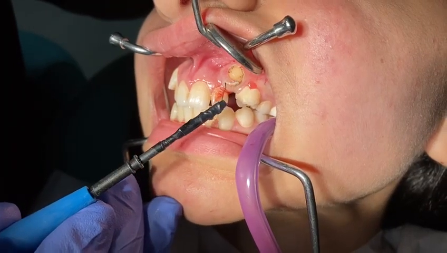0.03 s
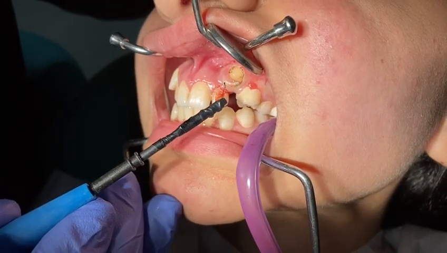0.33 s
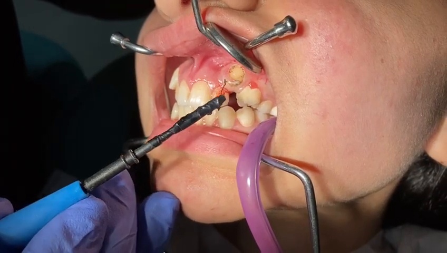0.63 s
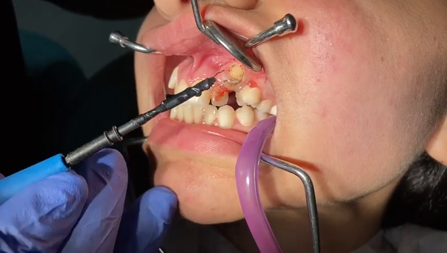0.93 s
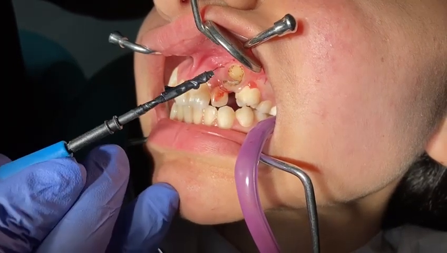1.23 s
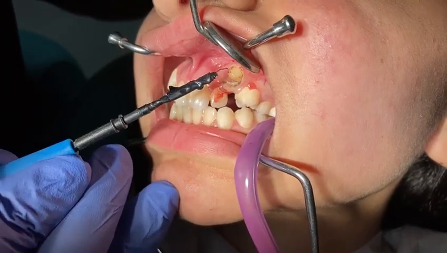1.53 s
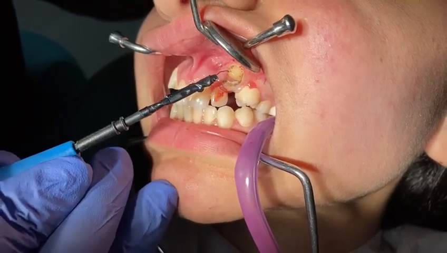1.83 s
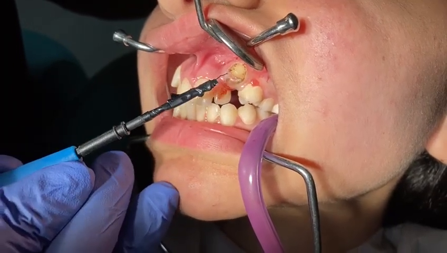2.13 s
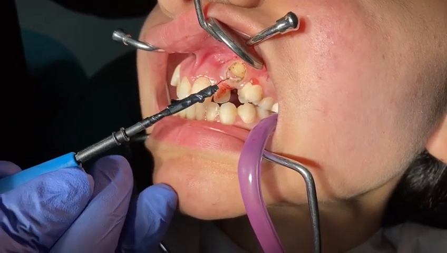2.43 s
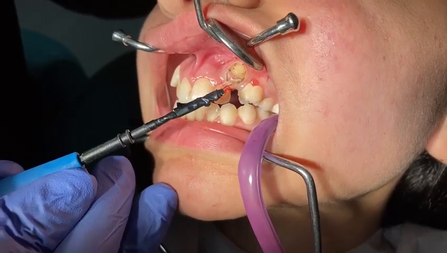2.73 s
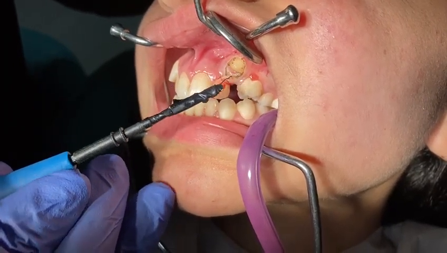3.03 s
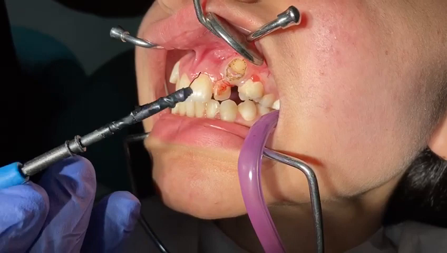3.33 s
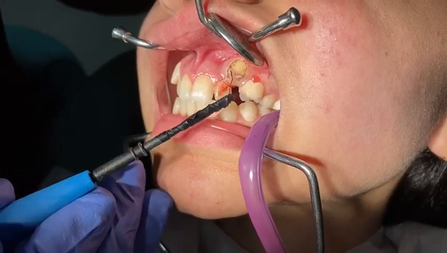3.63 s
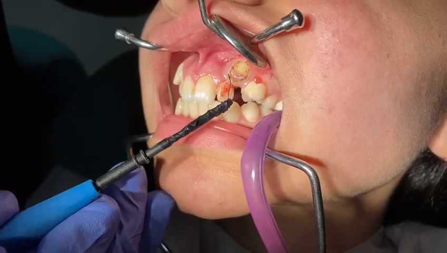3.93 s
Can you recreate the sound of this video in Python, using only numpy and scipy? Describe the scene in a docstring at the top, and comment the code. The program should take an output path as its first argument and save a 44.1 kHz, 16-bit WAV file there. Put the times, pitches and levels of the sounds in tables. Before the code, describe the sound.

A dental suction tube hisses steadily in a mouth, with a faint wet sizzle.

```python
"""A dental suction tube draws air steadily in a patient's open mouth, close to a stereo microphone.
The rushing air rings in the hollows of tube and mouth, and the narrow tip adds a bright hiss.
Saliva makes a fine sizzle and brief wet whistles. Near the end the tool moves and new pitches ring out.
Underneath lie the low air noise of the clinic room, one soft bump on the camera and three faint hums."""
import sys
import numpy as np
from scipy import signal
from scipy.fft import rfft, irfft, next_fast_len
from scipy.io import wavfile
from scipy.ndimage import uniform_filter1d, map_coordinates

SR = 44100
rng = np.random.default_rng(int(sys.argv[2]) if len(sys.argv) > 2 else 0)


def wav_record(signal):
    """Record a signal, one row per channel, as 16-bit PCM in the file named by sys.argv[1]."""
    frames = np.transpose(np.atleast_2d(signal))
    bounded = np.clip(frames, -1, 1)
    # unit amplitude maps onto the largest positive 16-bit level
    quanta = np.round(bounded * 32767).astype(np.int16)
    wavfile.write(sys.argv[1], SR, quanta)


N = 176400

# How strongly each pitch rings in the hollows of tube and mouth: pitch_hz, relative_db
RUSH_COLOUR = [(500, -59), (900, -25), (1130, -10.5), (1340, -4.5), (1550, -28.5), (1870, -12), (2000, -20),
               (2230, -8), (2480, -4), (2660, -10), (3120, -0.5), (3780, 1), (3950, -7), (4180, -10.5),
               (4320, -7.5), (4800, -9), (5150, -14.5), (5470, -2.5), (5850, -9), (6100, -21.5),
               (6350, -37), (7000, -66)]
# Narrow peaks and one dip that the tube adds: pitch_hz, width_hz, change_db
TUBE_RINGS = [(3181, 70, 2), (3300, 50, -2), (3700, 60, 2), (4820, 90, 4)]
# Slow drift of the rush's loudness: time_s, relative_db
RUSH_LEVEL = [(0.0, -36), (0.4, -36), (0.8, -35.5), (1.2, -35.5), (1.6, -35.5), (2.0, -36), (2.4, -36.5),
              (2.8, -36), (3.2, -35.5), (3.6, -35.5), (4.0, -34.5)]
# Brief surges and a dip of the rush: middle_s, change_db, half_length_s
RUSH_SURGES = [(.428, .8, .015), (.612, -2, .02), (1.06, 1, .04), (2.669, 2, .016), (3.347, 1.5, .006)]
# Drift of the rush below RUSH_LOW_HZ: time_s, change_db
RUSH_LOW_DRIFT = [(0, 0.5), (2, -0.5), (2.4, -2), (2.7, 0.5), (3.3, -1.5), (4, -2)]
# Drift of the rush above RUSH_HIGH_HZ: time_s, change_db
RUSH_HIGH_DRIFT = [(0, 1), (1.2, -2.6), (2.6, -0.5), (3.3, -1.5), (4, -1)]
RUSH_LOW_HZ, RUSH_HIGH_HZ, RUSH_GAIN_DB = 1720, 4450, 1.77

# How strong each pitch is in the hiss at the tip: pitch_hz, relative_db
HISS_COLOUR = [(5500, -54), (6250, -16.5), (6500, -8.5), (7450, -3), (8500, -0.5), (8950, -9), (9700, 2),
               (10380, -1), (10670, -19.5), (10850, -3.5), (11650, -2.5), (11900, -29)]
# Slow drift of the hiss's loudness: time_s, relative_db
HISS_LEVEL = [(0.0, -31), (0.4, -31.5), (0.8, -31.5), (1.2, -31), (1.6, -30.5), (2.0, -31), (2.4, -30.5),
              (2.8, -31), (3.2, -31.5), (3.6, -31), (4.0, -29.5)]
# Drift of the hiss below HISS_LOW_HZ: time_s, change_db
HISS_LOW_DRIFT = [(0, 0.9), (.8, 1.5), (2.2, 0), (3.2, 1.4), (3.6, -0.5), (4, -2)]
HISS_LOW_HZ, HISS_GAIN_DB = 8340, 0.33

# How alike left and right are for rush and hiss: pitch_hz, likeness_0_to_1
SUCTION_LIKENESS = [(850, .9), (1350, .75), (1650, .92), (2350, .62), (2600, .93), (2660, .995),
                    (2730, .99), (2850, .85), (3300, .66), (3650, .98), (4200, .48), (5000, .35),
                    (5400, .8), (5950, .8), (6450, 1), (7250, 1), (7900, .66), (8600, 1), (9500, 1),
                    (10500, .62), (11050, 1)]
# How far the suction's wave on the left runs ahead of the right: pitch_hz, lead_radians
LEFT_LEAD = [(900, 0), (1550, 2.95), (1950, 3.2), (2250, 4.05), (2600, 3), (2690, 3.14), (2770, 3.3),
             (3050, 4.75), (3850, 6.7), (4700, 5.7), (5000, 6.55), (5200, 9.2), (6000, 9.2), (6250, 6.25),
             (7450, 6.2), (8500, 3.15), (9550, 3.15), (10200, 1.8), (10750, 0)]
# How much louder the suction is on the left: pitch_hz, left_over_right_db
LEFT_LOUDER = [(800, .5), (1250, 2.8), (1600, .8), (2000, 1.6), (2350, 10), (2620, 0), (2780, 0),
               (3150, 4.5), (3330, 3.5), (3430, 0), (3800, .3), (4400, 8.7), (4950, 9), (5200, 1.8),
               (5800, 1.2), (6020, 3.5), (6300, 0)]

# How strong each pitch is in the room's air noise: pitch_hz, relative_db
ROOM_COLOUR = [(15, -46), (25, -18.5), (75, -6.5), (220, -2.5), (340, 2.5), (383, -3.5), (472, 1),
               (533, -4), (583, -0.5), (900, -7), (1170, -10.5), (1980, -120)]
# A further cut of the room noise, mildest at 1600 Hz: pitch_hz, change_db
ROOM_CUT = [(900, -18), (1600, -1), (4000, -60)]
# Low pitches that ring in the room noise: pitch_hz, width_hz, change_db
ROOM_RINGS = [(161.6, 16, 6), (208, 40, 3.5)]
# How alike left and right are for the room noise: pitch_hz, likeness_0_to_1
ROOM_LIKENESS = [(30, .88), (120, 1), (230, 1), (340, .92), (650, .65), (850, .9)]
# Drift of the room's rumble below RUMBLE_HZ: time_s, change_db
RUMBLE_DRIFT = [(0, 5), (.8, 4), (1.2, 1), (3, 0), (4, 2.5)]
RUMBLE_HZ, ROOM_DB = 127, -54.5

# Wet whistles of saliva: middle_s, pitch_hz, level_db, half_length_s
WHISTLES = [(.425, 3450, -35.5, .012), (1.055, 3620, -34, .011), (1.354, 3720, -33, .008),
            (1.624, 3170, -34, .014), (2.665, 3250, -32, .012), (2.935, 3650, -35, .008),
            (3.344, 3500, -29, .004), (3.984, 3770, -33, .01)]
# Faint hums in the room: middle_s, pitch_hz, level_db, half_length_s
HUMS = [(1.77, 621, -58.5, .09), (1.91, 469, -60.5, .09), (2.03, 624, -65.5, .07)]
# Pitches that ring out as the tool moves: middle_s, pitch_hz, change_db, half_length_s
TOOL_MOVES = [(3.35, 4520, 2.5, .13), (3.74, 5020, 4.5, .2), (3.85, 4230, 2.5, .13), (3.78, 6100, 5.5, .22)]


def amp(db):
    """Turn decibels into a number to multiply by."""
    return 10 ** (np.asarray(db) / 20)


def unit(x):
    """Scale a sound to an average strength (rms) of 1."""
    return x / np.sqrt(np.mean(x ** 2) + 1e-20)


def at_pitch(table, hz):
    """Read between the rows of a pitch table, with octaves about evenly spaced."""
    pitches, values = np.transpose(table)
    return np.interp(np.log(hz + 1), np.log(pitches + 1), values)


def over_time(table):
    """Join the rows of a time table with straight lines, one value per sample."""
    return np.interp(np.arange(N) / SR, *np.transpose(table))


def hill(middle_s, half_s):
    """A smooth rise to 1 and back, about a third as high half_s from its middle."""
    return np.exp(-((np.arange(N) / SR - middle_s) / half_s) ** 2)


def wobble(per_s):
    """A smooth curve through per_s random values a second."""
    return map_coordinates(rng.standard_normal(4000), [np.arange(N) * per_s / SR], mode="wrap")


def filtered(x, response):
    """Multiply each pitch in x by response(hz)."""
    size = next_fast_len(N + SR // 2)
    hz = np.fft.rfftfreq(size, 1 / SR)
    return irfft(rfft(x, size) * response(hz), size)[..., :N]


def ring_db(rings, hz):
    """Decibels that narrow peaks or dips add at each pitch."""
    return sum(db / (1 + (2 * (hz - pitch) / width) ** 2) for pitch, width, db in rings)


def drift_band(x, edge_hz, drift, above=False):
    """Turn the part below (or above) edge_hz up and down over time."""
    low = filtered(x, lambda hz: 1 / (1 + (hz / edge_hz) ** 20))
    return x + (amp(over_time(drift)) - 1) * (x - low if above else low)


def swirling_air(colour, likeness, patchy_db):
    """Uneven stereo noise, like swirling air; colour(hz) gives each pitch's relative decibels."""
    grid = signal.stft(rng.standard_normal((2, N)), nperseg=512)[2]  # side, pitch, time
    patches = uniform_filter1d(rng.standard_normal(grid.shape[1:]), size=4, axis=0)
    patches = unit(uniform_filter1d(patches, size=7, axis=1))
    noise = signal.istft(grid * amp(patchy_db * patches), nperseg=512)[1][:, :N]

    def response(hz):
        spread = np.arccos(np.clip(at_pitch(likeness, hz), 0, 1)) / 2  # 0 makes both sides the same
        return amp(colour(hz)) * [np.cos(spread), np.sin(spread)]
    shared, opposite = filtered(noise, response)
    return unit(np.array([shared + opposite, shared - opposite]))


def rush(flow_db, flutter_db):
    """Rushing air rings in the hollows of tube and mouth, with brief surges."""
    surge_db = sum(db * hill(middle_s, half_s) for middle_s, db, half_s in RUSH_SURGES)
    level_db = over_time(RUSH_LEVEL) + RUSH_GAIN_DB + surge_db + flow_db + flutter_db * wobble(per_s=65)
    colour = lambda hz: at_pitch(RUSH_COLOUR, hz) + ring_db(TUBE_RINGS, hz)
    air = amp(level_db) * swirling_air(colour, SUCTION_LIKENESS, patchy_db=0.6)
    air = drift_band(air, RUSH_LOW_HZ, RUSH_LOW_DRIFT)
    return drift_band(air, RUSH_HIGH_HZ, RUSH_HIGH_DRIFT, above=True)


def tip_hiss(flow_db, flutter_db):
    """A jet of air through the narrow tip makes a bright, quickly fluttering hiss."""
    level_db = over_time(HISS_LEVEL) + HISS_GAIN_DB + flow_db + flutter_db * wobble(per_s=94)
    jet = swirling_air(lambda hz: at_pitch(HISS_COLOUR, hz), SUCTION_LIKENESS, patchy_db=1.1)
    return drift_band(amp(level_db) * jet, HISS_LOW_HZ, HISS_LOW_DRIFT)


def saliva_sizzle(drops_per_s=220, low_hz=3700, high_hz=6200, ring_s=0.055, level_db=-49):
    """Tiny drops are drawn into the tube, each ringing briefly at its own pitch."""
    when, pitch, size = rng.random((int(drops_per_s * N / SR), 3)).T[:, :, None]
    t = np.arange(int(ring_s * SR)) / SR
    hz = low_hz * (high_hz / low_hz) ** pitch
    rise_and_fade = np.sqrt(t) * 1000 ** (-t / ring_s)
    drops = size * rise_and_fade * np.sin(2 * np.pi * hz * t) / hz  # higher drops are quieter
    positions = (when * N).astype(int) + np.arange(len(t))
    sizzle = np.bincount(positions.ravel(), drops.ravel(), N)[:N]  # add each drop at its own time
    return amp(level_db) * unit(sizzle)


def left_and_right(x):
    """Each pitch reaches the microphone's two openings with its own timing and loudness."""
    def response(hz):
        sides = np.array([[.5], [-.5]])
        gain = amp(sides * at_pitch(LEFT_LOUDER, hz))
        gain /= np.sqrt(np.mean(gain ** 2, axis=0))  # keep the total power
        return gain * np.exp(1j * sides * at_pitch(LEFT_LEAD, hz))
    return filtered(x, response)


def suction(unsteady_db):
    """One slightly unsteady flow of air drives rush and hiss; saliva adds sizzle and whistles."""
    flow_db = unsteady_db * wobble(per_s=48)
    air = rush(flow_db, flutter_db=0.21) + tip_hiss(flow_db, flutter_db=0.15)
    wet_air = moving_tool(air + saliva_sizzle())
    return left_and_right(wet_air + saliva_whistles())


def room_air():
    """The clinic's air makes a low, even noise over a slowly changing rumble."""
    colour = lambda hz: at_pitch(ROOM_COLOUR, hz) + at_pitch(ROOM_CUT, hz) + ring_db(ROOM_RINGS, hz)
    air = swirling_air(colour, ROOM_LIKENESS, patchy_db=1.3)
    return amp(ROOM_DB) * drift_band(air, RUMBLE_HZ, RUMBLE_DRIFT)


def soft_tone(middle_s, pitch_hz, level_db, half_s, fall_hz_per_s=0):
    """A pure tone that fades in and out and can slide down in pitch."""
    t = np.arange(N) / SR - middle_s
    wave = np.cos(2 * np.pi * (pitch_hz - fall_hz_per_s * t / 2) * t)
    return amp(level_db) * hill(middle_s, half_s) * wave


def bump():
    """A soft knock on the camera makes a low thud that sinks in pitch."""
    return soft_tone(middle_s=0.235, pitch_hz=72, level_db=-44, half_s=0.0115, fall_hz_per_s=1200)


def saliva_whistles(waver_hz=60):
    """Saliva narrows the opening for a moment, and the air whistles with a wavering pitch."""
    whistles = np.zeros(N)
    for middle_s, pitch_hz, level_db, half_s in WHISTLES:
        hz = pitch_hz + waver_hz * wobble(per_s=270)
        wave = np.sin(2 * np.pi * np.cumsum(hz) / SR)
        whistles += amp(level_db) * hill(middle_s, half_s) * wave
    return whistles


def faint_hums():
    """Short hums, almost buried in the room noise."""
    return sum(soft_tone(*row) for row in HUMS)


def moving_tool(x, width_hz=490):
    """The tool moves in the mouth and lets one narrow band of pitches after another ring out."""
    extra = 0
    for middle_s, pitch_hz, change_db, half_s in TOOL_MOVES:
        band = filtered(x, lambda hz: np.exp(-(2 * (hz - pitch_hz) / width_hz) ** 2))
        extra += (amp(change_db * hill(middle_s, half_s)) - 1) * band
    return x + extra


def scene():
    """The suction up close, with the quiet room, the bump and the hums underneath."""
    return suction(unsteady_db=0.47) + room_air() + bump() + faint_hums()


def record(dry):
    """Cut away the very highest pitches."""
    return filtered(dry, lambda hz: hz < 11950)


dry = scene()
out = record(dry)
wav_record(out)
```